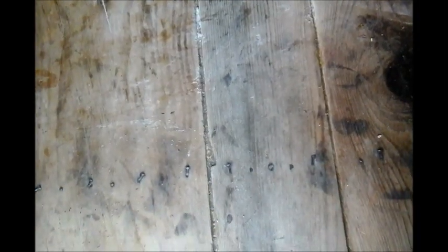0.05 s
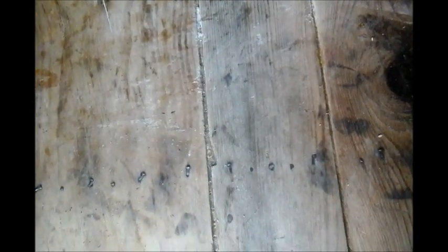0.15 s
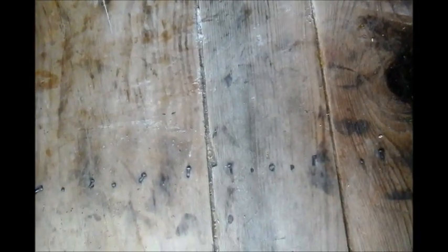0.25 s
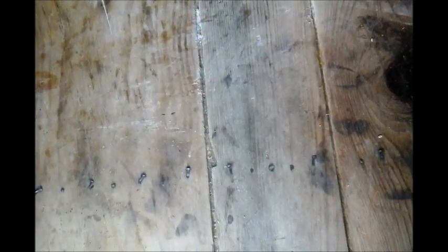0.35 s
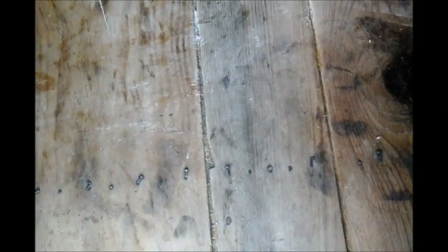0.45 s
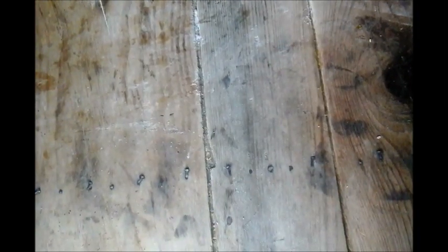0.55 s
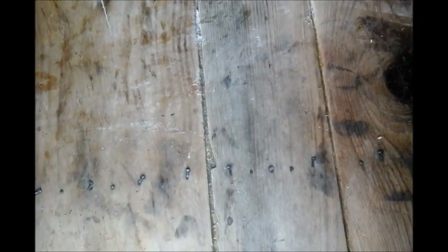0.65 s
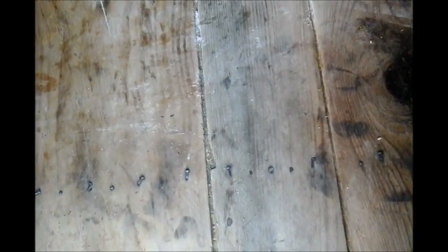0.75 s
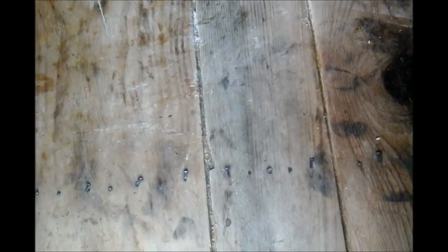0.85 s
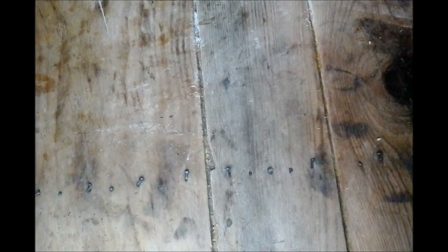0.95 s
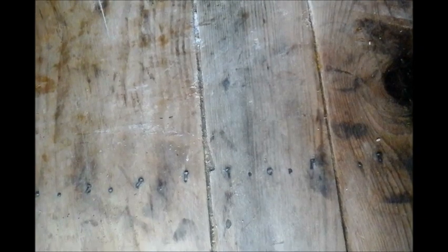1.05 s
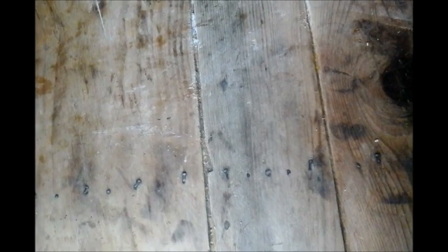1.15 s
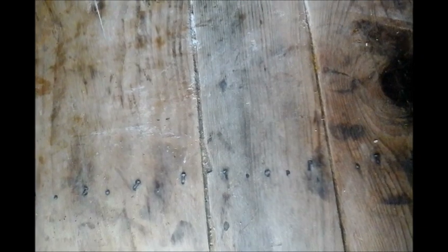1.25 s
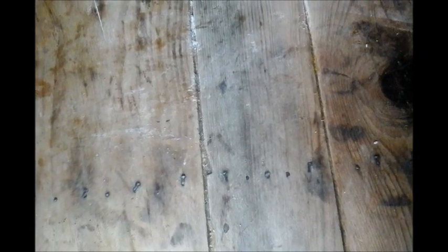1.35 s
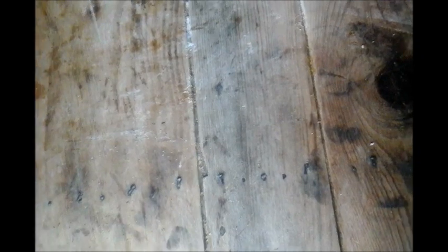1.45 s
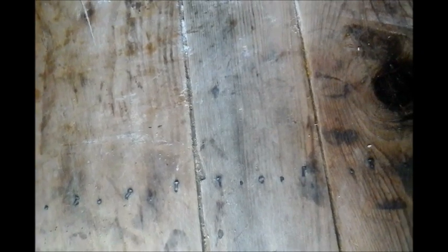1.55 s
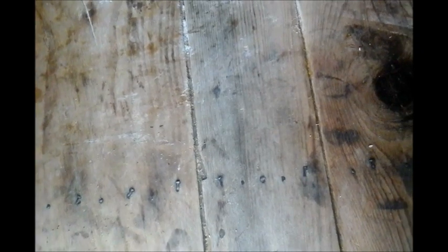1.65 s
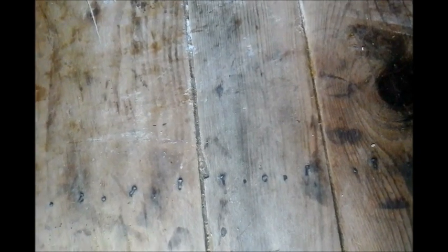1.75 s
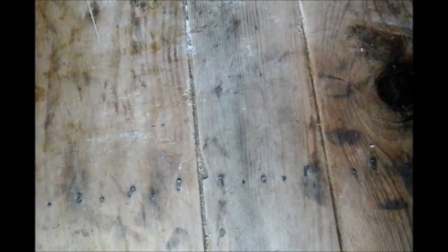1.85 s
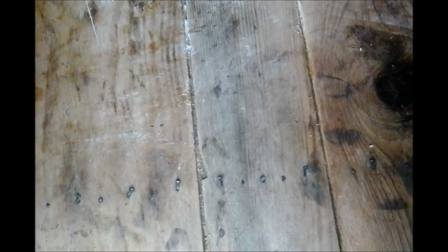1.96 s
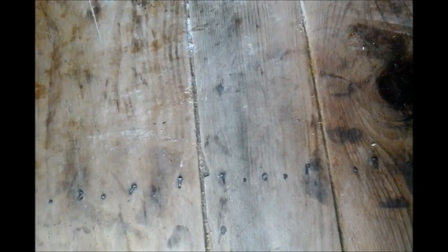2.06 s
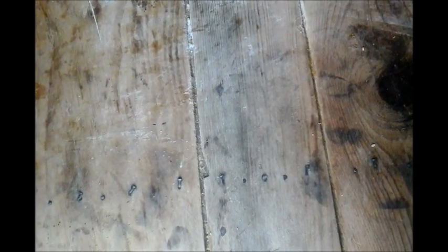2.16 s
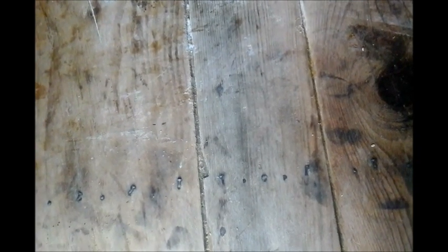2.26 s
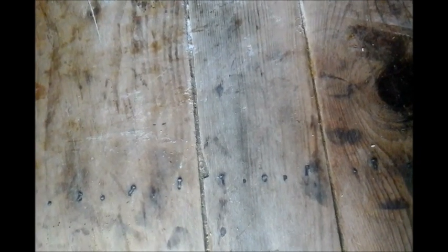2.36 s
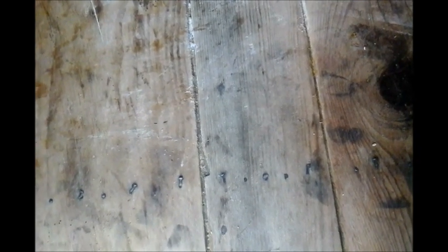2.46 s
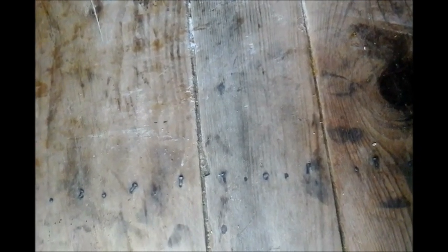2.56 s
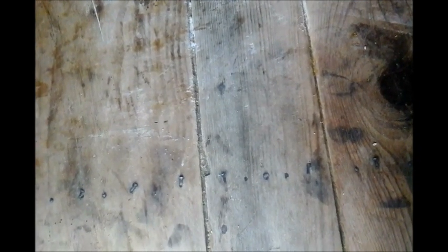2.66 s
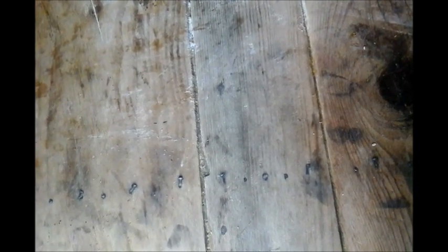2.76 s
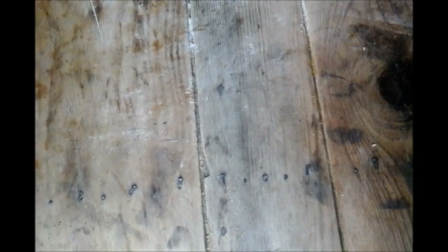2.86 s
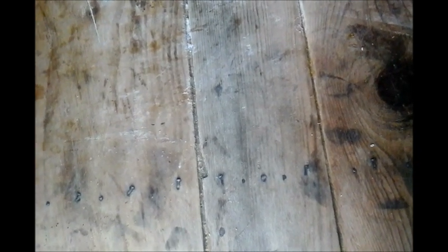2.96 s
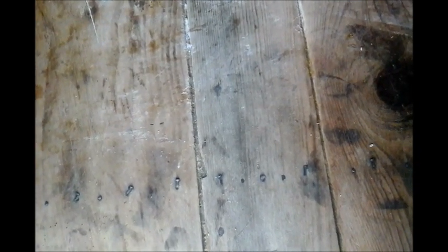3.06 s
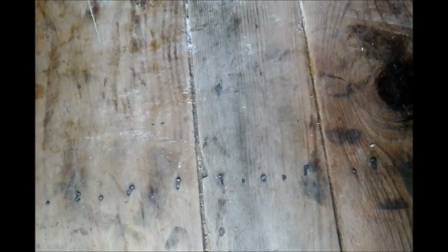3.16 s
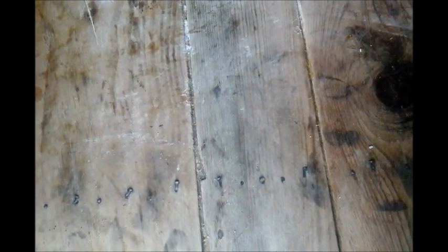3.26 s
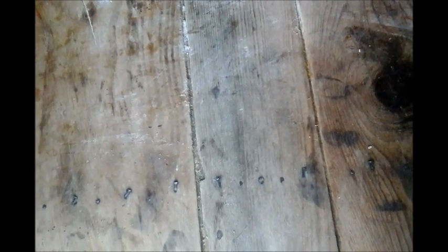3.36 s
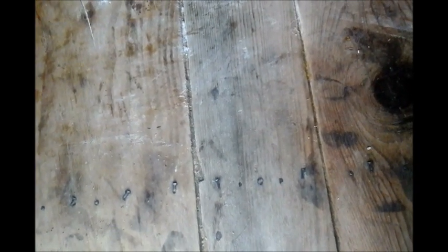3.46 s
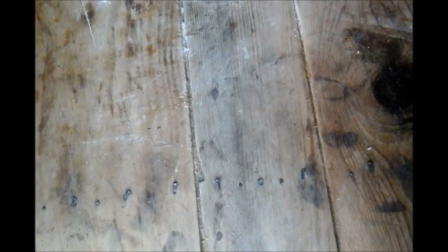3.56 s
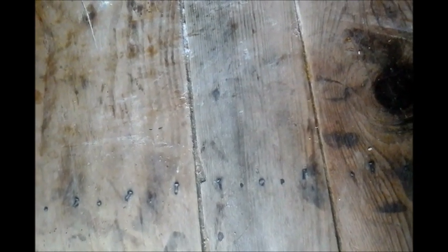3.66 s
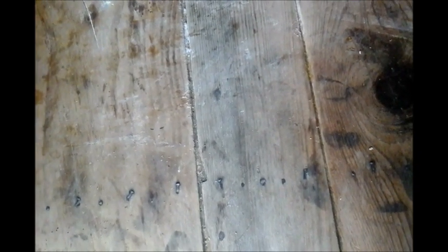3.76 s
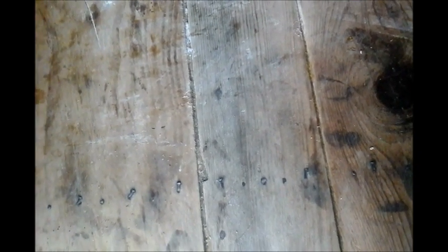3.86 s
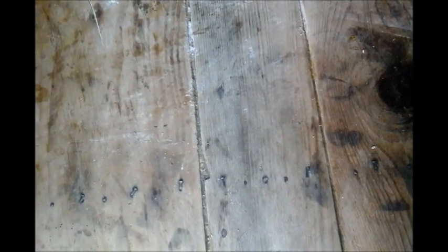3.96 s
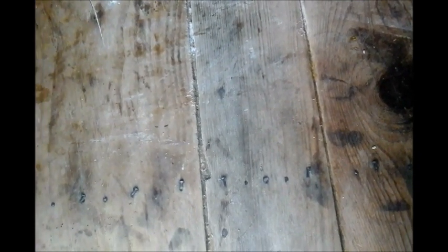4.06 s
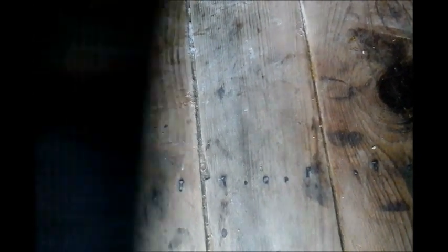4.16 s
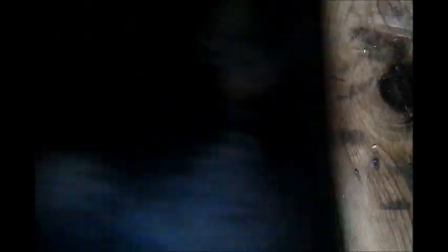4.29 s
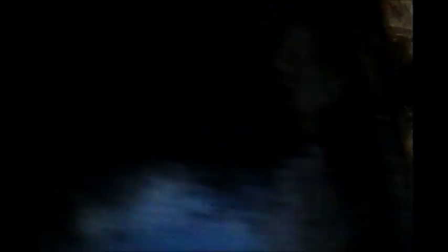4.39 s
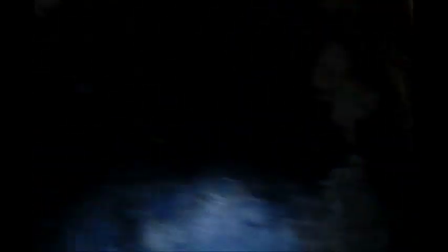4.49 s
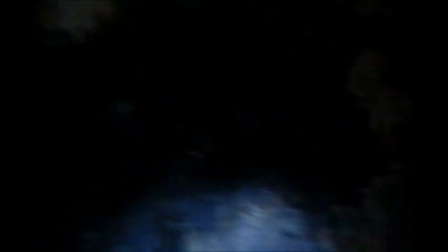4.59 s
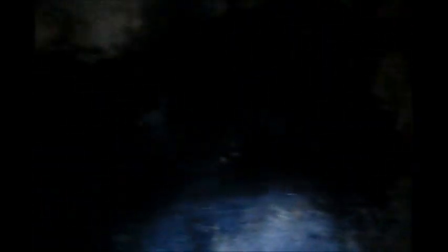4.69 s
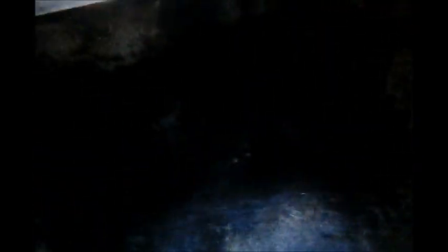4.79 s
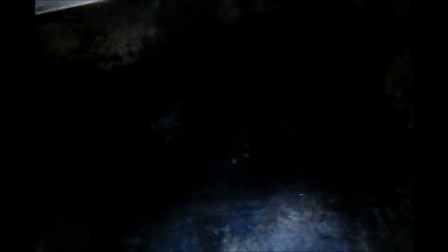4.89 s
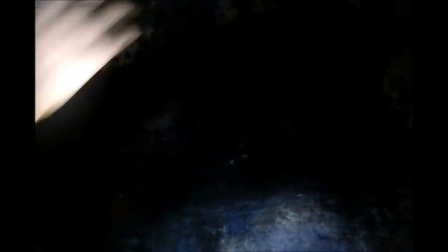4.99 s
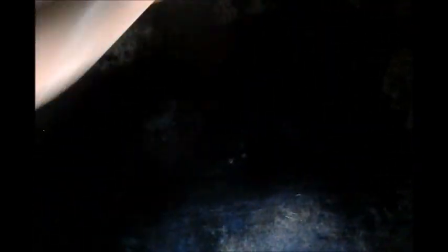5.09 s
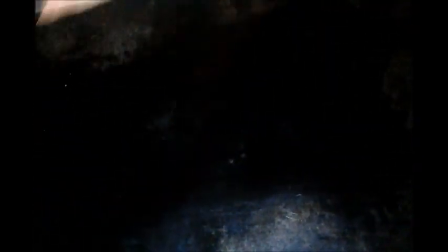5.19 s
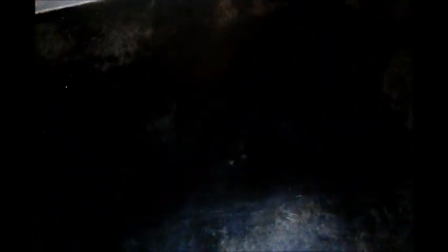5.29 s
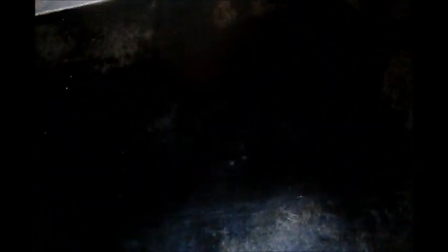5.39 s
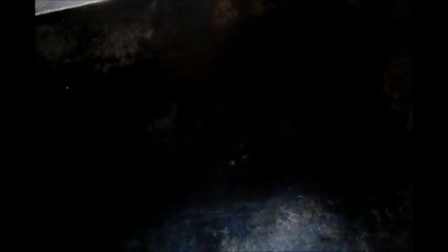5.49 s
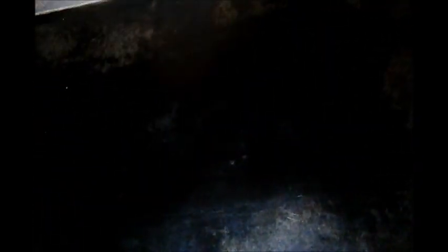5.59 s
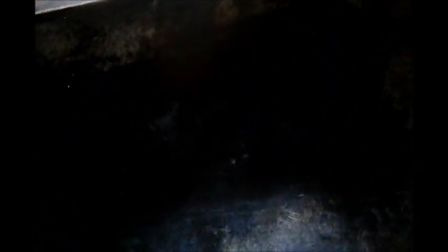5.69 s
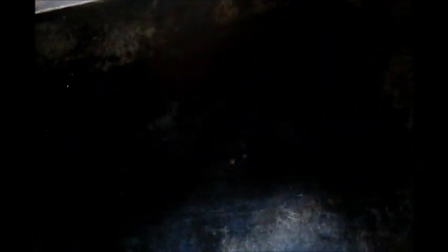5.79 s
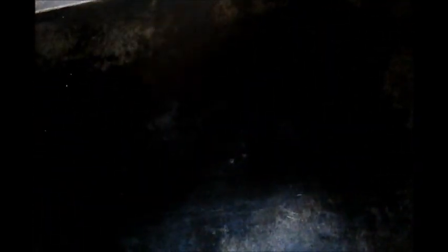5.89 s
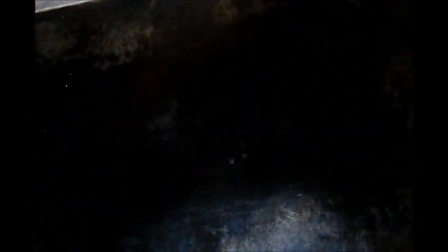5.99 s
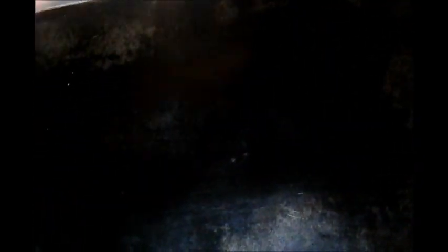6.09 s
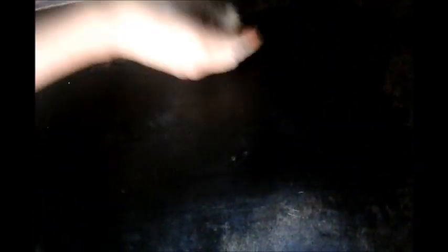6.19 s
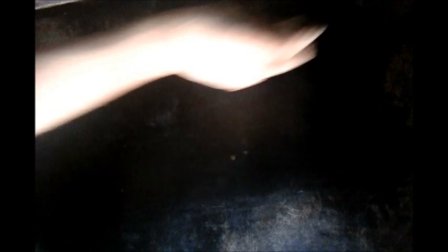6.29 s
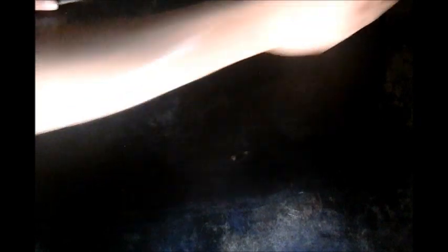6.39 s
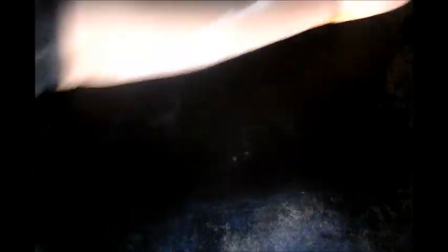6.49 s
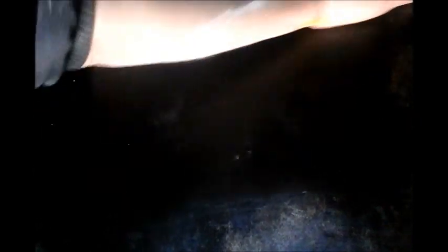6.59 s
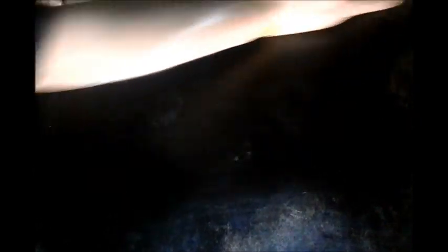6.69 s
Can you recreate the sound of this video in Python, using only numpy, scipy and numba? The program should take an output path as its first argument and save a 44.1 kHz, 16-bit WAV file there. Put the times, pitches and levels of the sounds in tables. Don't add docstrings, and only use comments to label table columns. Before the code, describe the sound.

Quiet room hiss and faint cloth rubbing come first. Thin sheet-metal trays slip and chatter against each other, pause, then give a hard knock with a short hollow ring. A far louder drop onto wood clips the close phone microphone, followed by fast uneven bounces and a rim tap. Low tray hum and wobble come nearer beneath hand rustle, closing on one small metallic tap.

```python
import sys
import numpy as np
from scipy import signal
from scipy.fft import rfft, irfft, next_fast_len
from scipy.io import wavfile
from scipy.ndimage import uniform_filter1d
from numba import njit

SR = 44100
rng = np.random.default_rng(int(sys.argv[2]) if len(sys.argv) > 2 else 0)


def ratio_of_db(decibels):
    return 10 ** (np.asarray(decibels, float) / 20)


def transcribe(u):
    v = np.clip(np.atleast_2d(u).T, -1, 1)
    q = np.round(v * 32767).astype(np.int16)
    wavfile.write(sys.argv[1], SR, q)


N = 297145


def at_hz(table, hz):
    rows = np.array(table)
    return np.interp(np.log(hz + 1), np.log(rows[:, 0] + 1), rows[:, 1])


def walk(rate):
    k = int(SR / rate)
    steps = np.repeat(rng.standard_normal(N // k + 1), k)
    return 0.31 * uniform_filter1d(uniform_filter1d(steps, k), k)[:N]


def grit(size, rate, spread_db):
    contacts = (rng.random(size) < rate / SR) * rng.standard_normal(size)
    x = contacts * ratio_of_db(spread_db * rng.exponential(size=size))
    return x / np.sqrt(np.mean(x ** 2))


def swell(t, s, rise, hold, db, fade_db):
    late = t - s[:, None]
    climb_db = 20 * np.maximum(-late, 0) / np.maximum(rise, .001)[:, None]
    fall_db = fade_db[:, None] * np.maximum(late - np.reshape(hold, (-1, 1)), 0)
    return np.sqrt((ratio_of_db(db[:, None] - climb_db - fall_db) ** 2).sum(axis=0))


# pitch in Hz, side minus mid in dB.
QUIET_SIDE = [(60, 14), (110, 22), (200, 11), (380, 6.5), (700, 4.5), (1290, -0.5), (15000, 0.5)]


def coloured(mid, side, colour, lo_hz, hi_hz):
    hz = np.arange(N // 2 + 1) * SR / N
    gain = ratio_of_db(at_hz(colour, hz))
    band = (hz > lo_hz) & (hz < hi_hz)
    gain = gain / np.sqrt(2 * np.sum(gain[band] ** 2) / N)
    return irfft([rfft(mid) * gain, rfft(side) * gain * ratio_of_db(at_hz(QUIET_SIDE, hz))], N)


# pitch in Hz, level in dB per Hz.
ROOM_COLOUR = [(15, -49), (25, -2.5), (122, -8), (156, -4), (221, -3), (313, -1.5), (389, -7.5),
               (421, -1.5), (457, -6), (648, -7.5), (2490, -14), (14550, -22.5), (14800, -60.5)]


def room():
    return coloured(*rng.standard_normal((2, N)), ROOM_COLOUR, 21.3, 15500) * ratio_of_db(-61)


# time in seconds, level of its hum in dB.
CARRIED = [(0, -63), (.7, -69), (.93, -56), (1.25, -75), (2.3, -62.5), (2.75, -66.5), (3.002, -62.5),
           (3.55, -58), (3.8, -56), (3.95, -54), (4.5, -56.5), (5.35, -54.5), (5.55, -53), (5.8, -51),
           (6.4, -50), (6.74, -51.5)]


def carried_db():
    return np.interp(np.arange(N) / SR, *np.transpose(CARRIED))


# time in seconds, rise in seconds, hold in seconds, level in dB, fading in dB per second.
RUBS = [(0.007, .02, 0.01, -58, 68), (0.236, 0.013, 0.017, -51, 96), (0.289, 0.03, 0.096, -44, 298),
        (0.446, 0.087, 0.06, -55.5, 78), (0.903, 0.15, 0.025, -55, 148), (1.04, .04, .02, -65, 16),
        (2.344, 0.25, 0.11, -57, 35), (2.798, .08, .05, -63.5, 60), (3, 0.078, 0.18, -52, 120),
        (3.477, 0.64, 0.034, -51.5, 41), (3.9, 0.004, 0.03, -55, 90), (4.052, 0.059, .02, -60.5, 79),
        (4.268, 0.11, .01, -53, 43), (5.057, 0.062, 0.22, -55, 74), (5.542, 0.14, .01, -51, 77),
        (6.04, 1, 0.32, -56.5, 132), (6.448, 0.052, .01, -48.5, 64), (6.634, 0.01, .003, -42.5, 503),
        (6.738, 0.086, .01, -39, 98)]
BRUSHES = [
    (0.872, 0.19, 0.069, -51.5, 108),
    (2.36, .15, .1, -77, 60),
    (3.9, .003, 0.022, -52, 150),
    (3.996, .01, .02, -54.5, 150),
    (4.044, .05, 0.021, -53.5, 200),
    (4.12, .03, 0.027, -60, 150),
    (4.22, .04, .03, -58, 100),
    (6.2, 0.22, .1, -64, 60),
]
SCRAPES = [
    (1.768, 0.044, 0.029, -39.5, 165),
    (0.27, .05, 0.053, -61, 150),
    (0.9, .1, .03, -61.5, 130),
    (4.4, .02, 0.0089, -58.5, 400),
    (3.205, .002, .003, -56, 900),
]
# pitch in Hz, level in dB per Hz.
RUB_COLOUR = [(410, -56), (700, -13), (931, -7.5), (2160, -6.5), (4520, -1), (5360, 2), (7220, -12),
              (13800, -21.5), (14700, -29), (14900, -73)]
BRUSH_COLOUR = [(1500, -30), (3500, -11), (4600, -3), (5300, 1), (6000, -6), (7200, -13.5), (13800, -22.5),
                (14900, -70)]
SCRAPE_COLOUR = [(5000, -40), (9000, -1.5), (12000, -3.5), (14600, -3), (15200, -50)]
HUM_COLOUR = [(88, -39), (150, -11), (183, -9), (352, 0.5), (425, -3), (737, -5), (1160, -8), (2090, -9),
              (3000, -13.5), (3900, -18.5), (6600, -120)]


def hands():
    t = np.arange(N) / SR
    rub = coloured(grit(N, 9000, 0.68), grit(N, 9000, 1.4), RUB_COLOUR, 2640, 7900)
    rub = rub * swell(t, *np.transpose(RUBS)) * ratio_of_db(4.3 * walk(24.98))
    hum = coloured(*rng.standard_normal((2, N)), HUM_COLOUR, 210, 2600)
    hum = hum * ratio_of_db(carried_db() + 0.28 * walk(15))
    brush = coloured(grit(N, 9000, 1.5), grit(N, 9000, 1.5), BRUSH_COLOUR, 2700, 7900)
    brush = brush * swell(t, *np.transpose(BRUSHES)) * ratio_of_db(2.8 * walk(30))
    scrape = coloured(grit(N, 4000, 2.2), grit(N, 4000, 2.9), SCRAPE_COLOUR, 8000, 15000)
    scrape = scrape * swell(t, *np.transpose(SCRAPES))
    return rub + hum + brush + scrape


# time in seconds, length in seconds, wobble level in dB, sway level in dB.
TREMORS = [(0.15, 0.17, -64, -56), (3.1, 0.18, -65, -54), (3.4, 0.23, -53, -52), (3.62, 0.26, -43.5, -73),
           (3.856, 0.37, -51.5, -48), (4.12, 0.1, -41, -52), (4.41, 0.27, -38, -51.5),
           (5.236, 0.49, -44.5, -51), (5.515, 0.11, -51, -63), (5.922, 0.35, -42, -56),
           (6.302, 0.36, -45.5, -59), (6.718, 0.45, -43, -44.5)]
# pitch in Hz, level in dB per Hz.
WOBBLE_COLOUR = [(70, -32), (100, -12), (115, 0.5), (130, -17), (150, -2.5), (175, -31), (260, -7.5),
                 (800, -92)]
SWAY_COLOUR = [(15, -38), (33, -13.5), (46, 1), (60, -12), (80, -8.5), (250, -98)]


def grip():
    s, length, wobble_db, sway_db = np.transpose(TREMORS)[:, :, None]
    bell = np.exp(-4 * ((np.arange(N) / SR - s) / length) ** 2)
    near_db = carried_db() + 60

    def shake(db, steady_db):
        return np.sqrt((ratio_of_db(2 * db) * bell).sum(axis=0) + ratio_of_db(2 * steady_db))

    noise = rng.standard_normal((4, N))
    wobble = coloured(noise[0], noise[1], WOBBLE_COLOUR, 90, 190) * ratio_of_db(-at_hz(QUIET_SIDE, 97))
    sway = coloured(noise[2], noise[3], SWAY_COLOUR, 25, 80) * ratio_of_db(-at_hz(QUIET_SIDE, 46))
    return wobble * shake(wobble_db, -58.5 + 0.39 * near_db) + sway * shake(sway_db, -62 + 0.6 * near_db)


@njit
def ring(treble, bass, share, pole, mid, side, count, flex):
    out = np.zeros((2, treble.shape[1]))
    for k in range(len(pole)):
        z, c, energy, turn = 0j, k % len(treble), 0., 1 + 0j
        for i in range(treble.shape[1]):
            push = share[k] * treble[c, i] + (1 - share[k]) * bass[c, i]
            if k < count:
                z = z * pole[k] + push
            else:
                energy = energy * abs(pole[k]) ** 2 + push ** 2
                turn = turn * pole[k] / abs(pole[k]) * np.exp(1j * flex[k - count, i])
                z = np.sqrt(energy) * turn
            out[0, i] += (z * mid[k]).imag
            out[1, i] += (z * side[k]).imag
    return out


# pitch in Hz, time to fall by 60 dB in seconds.
SHEET_T60 = [(100, 1), (500, 0.42), (1200, 0.38), (2000, 0.25), (3000, 0.1), (8000, 0.13)]
# pitch in Hz, side minus mid in dB.
TRAY_SIDE = [(60, 17), (110, 17.5), (200, 11), (380, 4.5), (700, 2.5), (1290, -3), (2380, 1.5),
             (15000, -1.5)]
# pitch in Hz, left minus right in dB.
TRAY_BALANCE = [(60, 33), (110, -6), (200, -6), (380, 2.5), (700, 1), (1290, 1.5), (2380, -2.5), (4400, -4),
                (8120, 1), (15000, 4)]
# pitch in Hz, phase in radians.
PORT_SCATTER = [(150, 0.54), (600, 0.87), (1100, 2.7), (3000, 2.25)]


def sheet(treble, bass, colour, modes, stand_db, damping, count=900):
    edges = np.linspace(7, 123, count + 1) ** 2
    low, width = edges[:-1], np.diff(edges)
    chance = rng.standard_normal((count + len(modes), 6)).T
    strong_hz, strong_db, strong_t60 = np.array(modes).T
    hz = np.r_[low + width * rng.random(count), strong_hz]
    heard = ratio_of_db(2 * at_hz(colour, low)) * width
    treble_power = heard[(low > 2500) & (low < 7000)].sum()
    bass_power = heard[(low > 300) & (low < 1500)].sum()
    thicket_power = width * ratio_of_db(3.0 * chance[5, :count] - 2.5)
    strong_power = bass_power * ratio_of_db(2 * (np.minimum(strong_db, -1.5) + stand_db - at_hz(colour, strong_hz)))
    power = np.r_[thicket_power, strong_power]
    thicket_t60 = at_hz(SHEET_T60, hz[:count]) * ratio_of_db(2.0 * chance[2, :count]) / damping
    t60 = np.r_[thicket_t60, np.clip(strong_t60, .03, 1.1) / np.sqrt(1 + strong_hz / 1500)]
    pole = np.exp(2j * np.pi * hz / SR - np.log(1000) / (t60 * SR))
    phase = (chance[0] + 1j * chance[1]) / np.hypot(chance[0], chance[1])
    mid = np.sqrt(2 * power * (1 - abs(pole) ** 2)) * phase
    lean = np.tanh(at_hz(TRAY_BALANCE, hz) * np.log(10) / 20)
    scatter = np.exp(1j * chance[3] * at_hz(PORT_SCATTER, hz))
    side = mid * (lean + 1j * np.sqrt(1 - lean ** 2) * scatter)
    share = 1 / (1 + (2100 / hz) ** 4)
    pace = (3.5 * ratio_of_db(3.01 * chance[4, count:]))[:, None] * np.arange(treble.shape[1]) / SR
    bend = np.sin(2 * np.pi * pace + 2 * chance[5, count:, None])
    flex = 0.008 * 2 * np.pi * strong_hz[:, None] / SR * bend
    treble = treble / np.sqrt(treble_power) + 1e-18
    bass = bass / np.sqrt(bass_power) + 1e-18
    mid, side = ring(treble, bass, share, pole, mid, side, count, flex)
    size = next_fast_len(len(mid) + 4000)
    hz = np.arange(size // 2 + 1) * SR / size
    gain = ratio_of_db(at_hz(colour, hz))
    side_gain = gain * ratio_of_db(at_hz(TRAY_SIDE, hz))
    return irfft([rfft(mid, size) * gain, rfft(side, size) * side_gain], size)[:, :len(mid)]


def strike(blows, start, size, count=8):
    force = np.zeros((2, count, size))
    t = np.arange(400) / SR
    for s, db, hard in blows:
        landing = 0.21 * rng.standard_normal((count, len(t))) * np.exp(-t / 0.0014)
        at = int(s * SR) - start
        split = np.clip([hard, 1.3 - hard], 0, 2)[:, None, None]
        force[:, :, at:at + len(t)] += ratio_of_db(db + 16.0) * split * landing
    return force


def add(out, x, start):
    out[:, start:start + x.shape[1]] += x[:, :N - start]


# time in seconds, peak in dB, hardness from 0 to 1.
TAPS = [
    (0.2314, -64, 0.93),
    (4.8856, -26.5, 1),
    (6.6308, -22, 0.8),
]
# pitch in Hz, level in dB per Hz.
TAP_COLOUR = [(120, -44), (200, -28), (443, -12), (1490, -13), (1850, -12), (2420, 1), (3120, -10),
              (4090, 4), (5450, 7), (8880, -32), (15000, -42)]
# pitch in Hz, level in dB, time to fall by 60 dB in seconds.
TAP_MODES = [(1140, 0, 0.51), (2400, 10, 0.08), (4340, -7, 0.16), (4996, -32, 5.0), (5400, -4, 0.11),
             (5545, -16, 0.15)]


def taps():
    out = np.zeros((2, N))
    for tap in TAPS:
        start = int(tap[0] * SR) - 2000
        hit = strike([tap], start, SR // 4)
        add(out, sheet(hit[0], hit[1], TAP_COLOUR, TAP_MODES, stand_db=-8, damping=0.78, count=300), start)
        add(out, ratio_of_db(-24.0) * signal.lfilter([1, 0, -1], 1, hit[0, :2]), start)
    return out


# time in
# seconds, level across the ports in dB, pitch in Hz, time to fall by 60 dB in seconds, spread of the cluster as
THUDS = [(1.634, -39, 178, 0.19, 0.14), (1.165, -44, 300, 0.15, 0.197), (1.77, -48, 165, 0.34, .12),
         (1.906, -30.5, 147.5, 0.21, 0.13), (1.91, -30.5, 360, 0.24, 0.118), (3.25, -39, 52, .3, .12),
         (2.96, -48.5, 600, 0.3, 0.17), (2.96, -57, 910, .3, 0.102), (2.958, -55, 1250, 0.38, 0.13),
         (3.8, -52.5, 358, 4.5, 0.03), (3.49, -56, 1255, 0.6, .01), (4.599, -18.5, 305, .15, .03),
         (4.599, -14, 467, 0.13, .02), (4.599, -13.5, 800, .2, 0.016), (4.599, -20.5, 940, .12, 0.024),
         (4.6, -17, 560, .2, .04), (4.6, -18.5, 3400, 0.13, .06), (4.6, -18.5, 2000, .12, 0.018),
         (4.709, -25, 2300, .25, .01), (4.599, -20, 1320, .12, .02), (4.8, -32, 1240, 0.79, 0.0031),
         (4.9, -29, 520, 0.63, 0.021), (5.055, -41, 1000, 0.28, .01), (5.6, -47, 2000, .1, .02),
         (4.595, -28, 56, 0.2, 0.2), (4.905, -27, 137.5, 0.41, 0.081), (5.03, -48, 1900, 0.44, .01),
         (5.015, -27.5, 528.4, 0.33, 0.0398),
         (4.95, -56, 3815, 0.7, 0.0015), (5.17, -59, 3815, 0.35, 0.002), (5.25, -62, 3815, .7, 0.0012),
         (5.168, -42, 700, .1, .04), (5.17, -46, 950, .1, .03), (5.243, -46, 800, .12, .15),
         (5.286, -45, 660, .16, .02), (5.34, -46, 700, .1, .03), (5.345, -52, 930, .1, .03),
         (3.6, -58, 712, .9, .002), (3.45, -52, 805, .7, .002), (3.58, -54, 352, 1.2, .004),
         (3.73, -50, 385, .2, .03), (3.82, -62, 762, 1.5, .001), (3.9, -47, 4900, .12, .07),
         (3.9, -51, 3600, .12, .06), (3.93, -68, 1650, .6, .006), (4.04, -52, 330, .4, .06)]


def thuds():
    out, t = np.zeros((2, N)), np.arange(SR) / SR
    for s, db, hz, t60, spread in THUDS:
        detune, phase = np.array([[-1], [.2], [1]]), rng.standard_normal((3, 1))
        body = np.sin(2 * np.pi * hz * (1 + spread * detune) * t + .5 * phase).sum(axis=0)
        body = body * np.exp(-np.log(1000) * t / t60) * (1 - np.exp(-t / 0.002)) * (1 - t)
        body = signal.lfilter(*signal.butter(2, hz / 2, "high", fs=SR), body)
        ports = np.array([[ratio_of_db(-at_hz(TRAY_SIDE, hz))], [1]])
        add(out, ratio_of_db(db) * body * ports, int(s * SR))
    return out


# start in seconds, end in seconds.
SPANS = [
    (1.585, 2.25),
    (2.95, 4.15),
    (4.598, 5.45),
]


def clatter(span, rattles, blows, colour, modes, stand_db, rate, damping, linger):
    s, rise, treble_db, bass_db, fade_db = np.transpose(rattles)
    start = int(span[0] * SR) - 2000
    size = int((span[1] + .4) * SR) - start
    t = (start + np.arange(size)) / SR
    hit = strike(blows, start, size)
    contacts = grit(hit[0].shape, rate, 2.39)
    treble = contacts * swell(t, s, rise, 0, treble_db - 1.5, fade_db)
    bass = contacts * swell(t, s, rise, 0, bass_db - 4, linger * fade_db)
    out = np.zeros((2, N))
    add(out, sheet(treble + hit[0], bass + hit[1], colour, modes, stand_db, damping), start)
    crack = signal.lfilter(*signal.butter(3, (2200, 6470), "band", fs=SR), hit[0, :2])
    add(out, ratio_of_db(-17.5) * crack, start)
    return out


# peak time in seconds, rise in seconds, treble level in dB,
# bass level in dB, fading of the treble in dB per second.
DRAG_RATTLES = [
    (1.6, 0.011, -37.5, -35.5, 90),
    (1.654, 0.037, -21, -15.5, 118),
    (1.70, 0.062, -26.5, -36, 260),
    (1.773, 0.038, -16.5, -16.5, 110.5),
    (1.959, 0.063, -40, -33.5, 199.5),
    (2.06, 0.039, -62, -41.5, 139),
]
# time in seconds, peak in dB, hardness from 0 to 1.
DRAG_BLOWS = [(1.596, -25.5, 0.3), (1.6319, -13.5, 0.52), (1.6467, -16, 0.5), (1.659, -17, .4),
              (1.673, -19, .5), (1.705, -20, .4), (1.754, -16, 1), (1.7664, -14, 1), (1.7709, -16, .9),
              (1.787, -18, .8), (1.824, -20, 0.7), (1.858, -27, .7), (1.8891, -19.5, 0.1), (1.91, -22, 0.3),
              (1.99, -29.5, 0.7), (2.0983, -38, 0.85)]
# pitch in Hz, level in dB per Hz.
DRAG_COLOUR = [(35, -61), (60, -33.5), (381, -6.5), (458, -6), (503, -1.5), (564, -10), (605, 0),
               (695, -6.5), (816, -1), (1270, -2), (3580, -5), (5400, -3), (7200, -17), (10800, -25),
               (15000, -38)]
# pitch in Hz, level in dB, time to fall by 60 dB in seconds.
DRAG_MODES = [(360, -14, 1), (617, -27, 0.34), (1114, -17, 0.79), (1223, 0, 0.13), (1503, -3, 0.35),
              (1640, -7, 0.21), (1620, -6, 0.38), (1690, -20, 0.36), (1840, -10, 0.37), (2460, -12, 0.67),
              (2550, -20, 0.47), (2720, -14, 0.36)]


def drag():
    return clatter(SPANS[0], DRAG_RATTLES, DRAG_BLOWS, DRAG_COLOUR, DRAG_MODES,
                   stand_db=-14.0, rate=2600, damping=1.4, linger=1.37)


KNOCK_RATTLES = [
    (2.96, 0.0074, -53.5, -50.5, 45),
    (3.189, 0.033, -52, -33, 200),
    (3.213, 0.0038, -17, -13.5, 179),
    (3.247, .008, -23, -22, 300),
    (3.39, .03, -51, -38, 130),
    (3.902, .003, -46.5, -53, 260),
]
# time in seconds, peak in dB, hardness from 0 to 1.
KNOCK_BLOWS = [(2.954, -34.5, 0.2), (2.97, -36, .1), (2.99, -37.5, .1), (3.187, -32, .3),
               (3.206, -7.5, 0.93), (3.2145, -12, 0.63), (3.229, -16, .7), (3.248, -10.5, 1),
               (3.265, -12, 0.42), (3.291, -24, 0.33), (3.331, -23, .2), (3.404, -28, 0.22)]
# pitch in Hz, level in dB per Hz.
KNOCK_COLOUR = [(35, -63), (60, -43), (257, -18.5), (332, -5), (408, -4), (480, -0.5), (744, -4.5),
                (895, -1.5), (2310, -9.5), (5060, -11.5), (8620, -35.5), (9450, -54), (15000, -111)]
# pitch in Hz, level in dB, time to fall by 60 dB in seconds.
KNOCK_MODES = [(477, 0, 0.15), (431, -6.5, .3), (533, -10, 0.45), (710, -6, 0.8), (800, -12, 0.97),
               (926, -11, 0.55), (1110, -7, 0.44), (1210, -8, 0.33), (1340, -3, 0.45), (1450, -3, 0.35),
               (1630, -12, 0.21), (1670, -26, 0.5), (1940, -24, 0.48), (2546, -26, 0.44), (2708, -19, 0.22)]
BENDING = [(140, -22.5, 2), (351, -8, 0.4), (594, -14, .5)]


def knock():
    return clatter(SPANS[1], KNOCK_RATTLES, KNOCK_BLOWS, KNOCK_COLOUR, KNOCK_MODES + BENDING,
                   stand_db=-13.5, rate=2000, damping=0.97, linger=0.6)


def airy(colour):
    rows = [row for row in colour if row[0] < 8700]
    return rows + [(15000, rows[-1][1] - 9)]


DROP_RATTLES = [
    (4.601, 0.0029, -11, -10, 258),
    (4.691, 0.042, -32, -10.5, 200),
    (4.711, .002, -23, -22, 240),
    (4.74, .01, -28.5, -26, 300),
    (4.788, .002, -28.5, -22, 260),
    (4.905, .002, -30, -26, 400),
    (4.92, 0.004, -27.5, -23.5, 250),
    (5.1, .03, -62, -44.5, 150),
    (5.173, .006, -53, -47, 250),
    (5.255, 0.022, -59, -55, 59.4),
]
# time in seconds, peak in dB, hardness from 0 to 1.
DROP_BLOWS = [(4.5983, 6.5, 0.68), (4.6057, -2.5, 0.74), (4.648, -14, .2), (4.687, -17.5, 0.36),
              (4.7085, -9, 0.55), (4.722, -13, 0.52), (4.737, -19, .6), (4.7867, -11, 0.51),
              (4.794, -18, 0.37), (4.8123, -21, 0.32), (4.8417, -19, .3), (4.9039, -17.5, 0.66),
              (4.9181, -18, 0.86), (4.932, -26, .7), (5.064, -43, 0.48), (5.089, -41, 0.35),
              (5.171, -32.5, .4), (5.25, -40, 0.5)]
# pitch in Hz, level in dB per Hz.
DROP_COLOUR = [(35, -68), (60, -44.5), (295, -17.5), (448, -5.5), (591, -7), (798, -7.5), (1210, -8.5),
               (1830, -11.5), (2420, -11.5), (3660, -18.5), (4950, -15), (8040, -39), (15000, -71.5)]
# pitch in Hz, level in dB, time to fall by 60 dB in seconds.
DROP_MODES = [(410, -5, 0.5), (444, -4, 0.8), (547, -6, 0.8), (707, -6, 0.55), (775, -3, 0.55),
              (798, -3, .4), (869, -4, 0.6), (950, -8, 0.4), (1046, -3, .75), (1180, -4, .8), (1238, -4, 1),
              (1394, -9, 0.6), (1471, -8, .7), (1669, -10, 0.45),
              (635, -8, .5), (923, -7, .4), (1100, -8, .4), (1290, -10, .35), (1620, -11, .5),
               (1890, -13, .6), (1945, -10, .5), (2056, -14, .45), (2238, -11, .25), (2290, -13, .5),
               (2417, -13, .35), (2471, -8, .5), (2638, -13, .25), (2860, -16, .3)]


def drop():
    modes = DROP_MODES + BENDING[:1]
    return clatter(SPANS[2], DROP_RATTLES, DROP_BLOWS, airy(DROP_COLOUR), modes,
                   stand_db=-12.0, rate=600, damping=1.55, linger=0.4)


def scene():
    mid, side = room() + hands() + grip() + taps() + thuds() + drag() + knock() + drop()
    return np.array([mid + side, mid - side])


# time in seconds, half length in seconds.
SHARP_CLICKS = [
    (3.206, .004),
    (4.6, .02),
    (4.642, .002),
    (4.886, .016),
]


def thin_treble(x):
    hz, _, z = signal.stft(x, SR, nperseg=2048)
    power = (abs(z) ** 2).mean(axis=0)
    band_db = 10 * np.log10(uniform_filter1d(power, size=10, axis=0) + 1e-20)
    top_db = band_db[hz > 400].max(axis=0)
    tilt_db = 4 * np.log2(hz / 8000 + 1e-9)[:, None]
    highest = (hz > 10940)[:, None]
    luck = np.clip(rng.standard_normal((len(hz) // 12 + 1, len(top_db))), -1.2, 2)
    luck_db = 4.5 * np.repeat(luck, 12, axis=0)[:len(hz)]
    near_db = band_db[(hz > 4000) & (hz < 6500)].mean(axis=0) - 25.5
    limit_db = np.maximum(top_db - 46.5 + 0.34 * (top_db + 41.0), near_db + 3 * highest)
    limit_db = limit_db + tilt_db + luck_db * np.where(highest, 1, 0.35)
    keep = (band_db > limit_db) | (hz < 7800)[:, None]
    keep = np.where(top_db > -47, np.minimum.accumulate(keep, axis=0), keep)
    thinned = signal.istft(z * keep, SR, nperseg=2048)[1][:, :N]
    s, half = np.transpose(SHARP_CLICKS)[:, :, None]
    spared = np.exp(-((np.arange(N) / SR - s) / half) ** 4).max(axis=0)
    return thinned + spared * (x - thinned)


def roll_off(x):
    return signal.sosfilt(signal.butter(12, 15830, fs=SR, output="sos"), x)


def record(dry):
    full = thin_treble(np.clip(dry, -1, 1))
    return roll_off(full)


dry = scene()
out = record(dry)
transcribe(out)
```